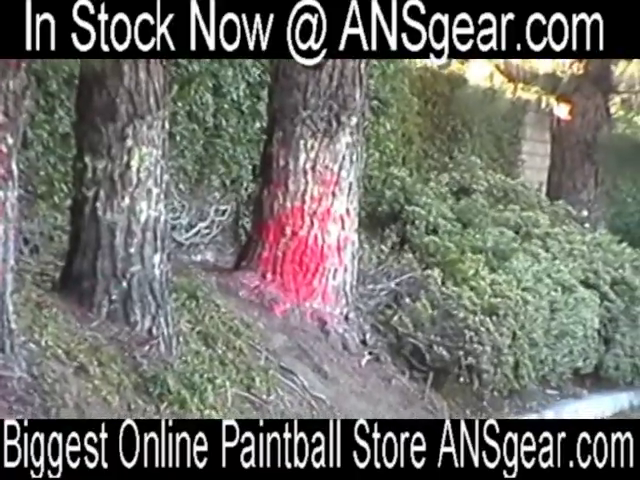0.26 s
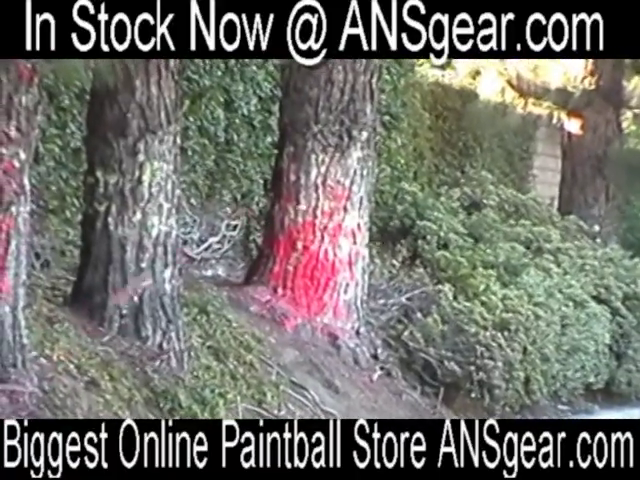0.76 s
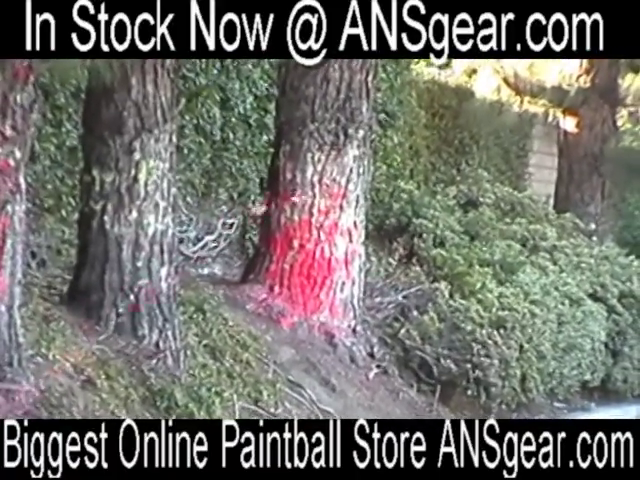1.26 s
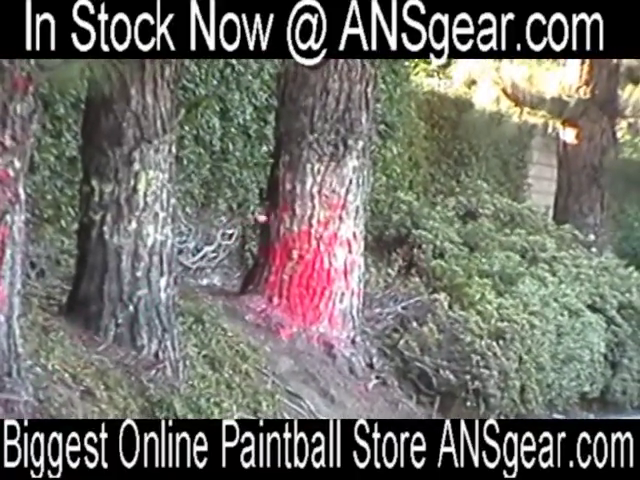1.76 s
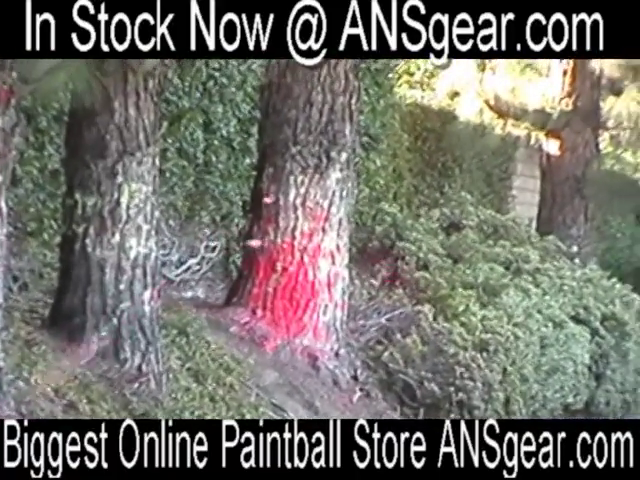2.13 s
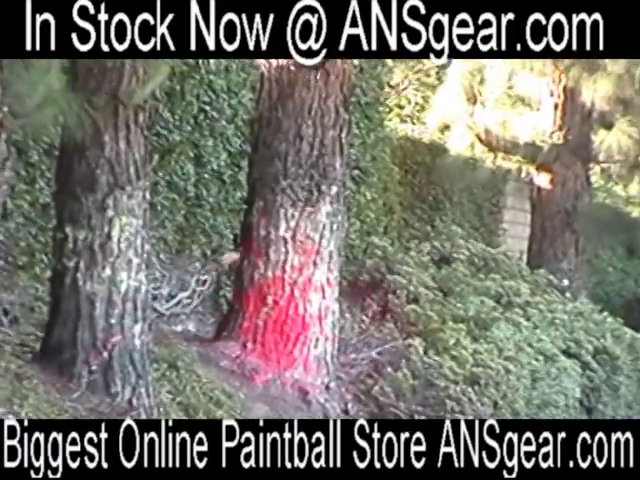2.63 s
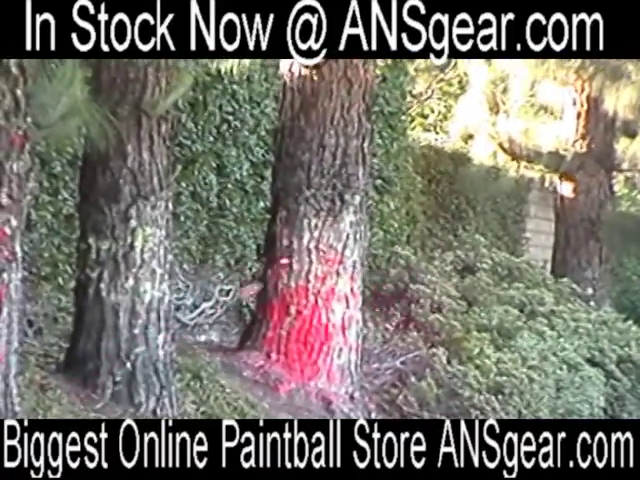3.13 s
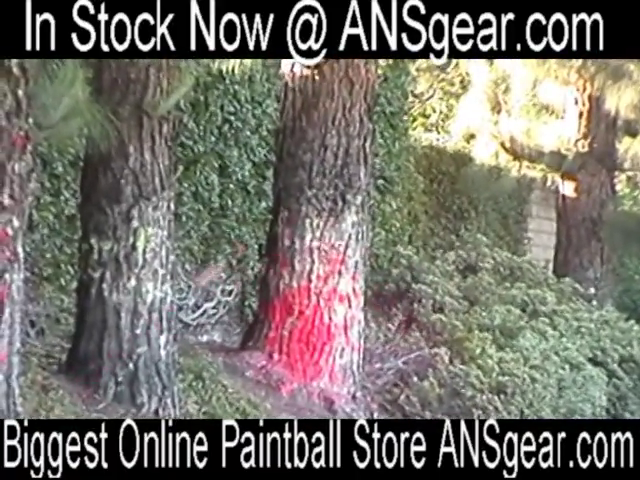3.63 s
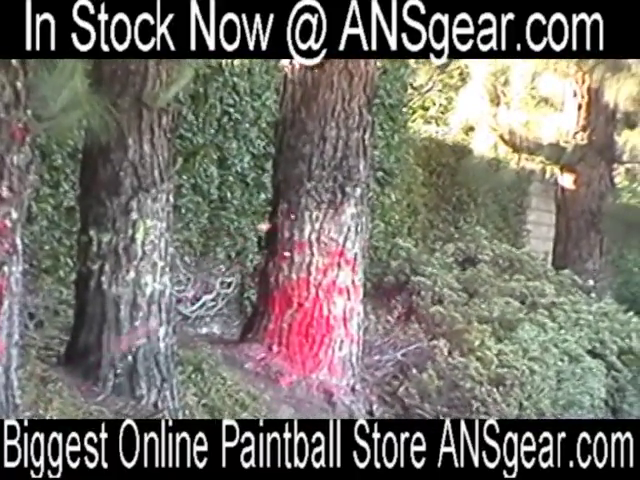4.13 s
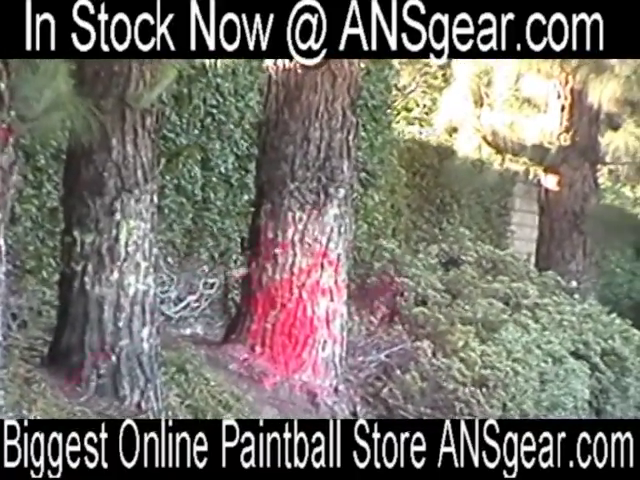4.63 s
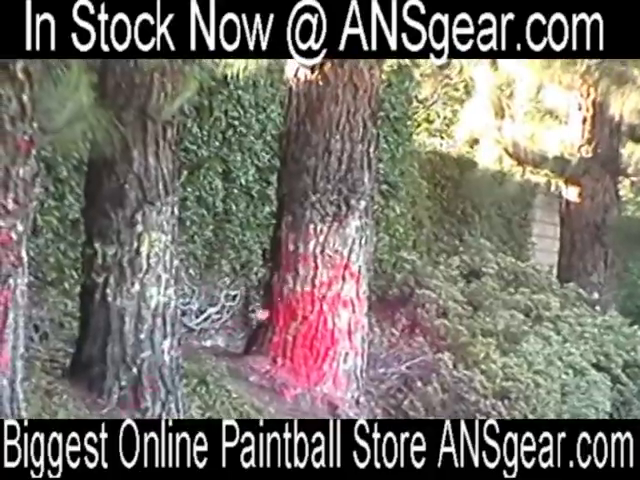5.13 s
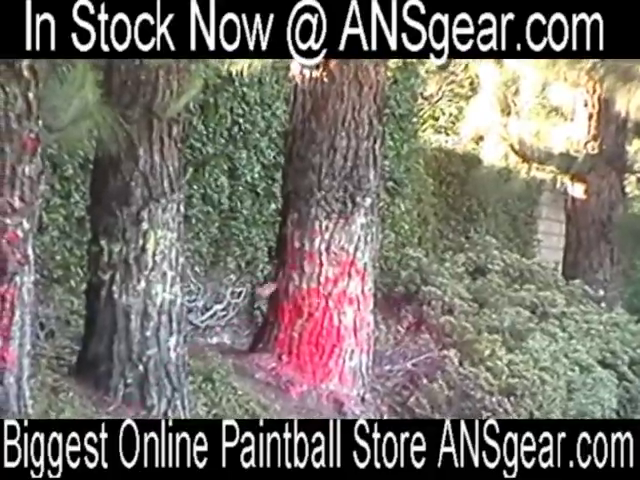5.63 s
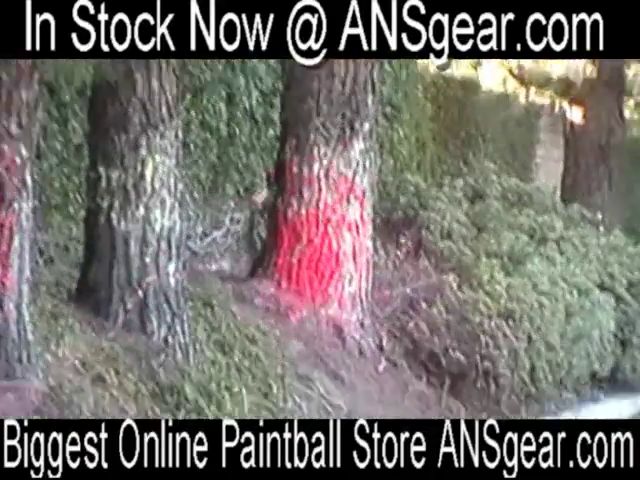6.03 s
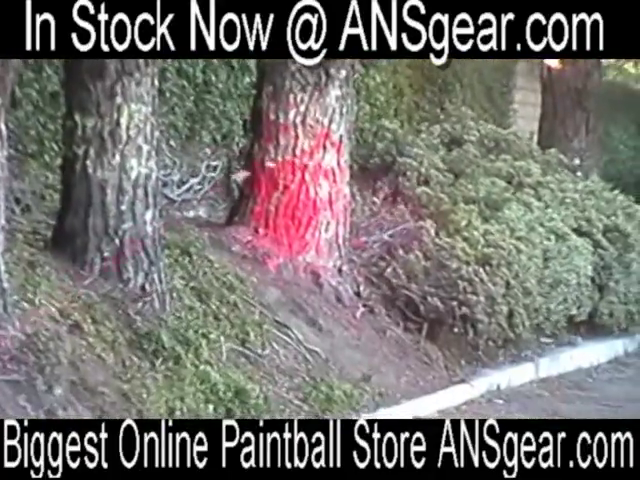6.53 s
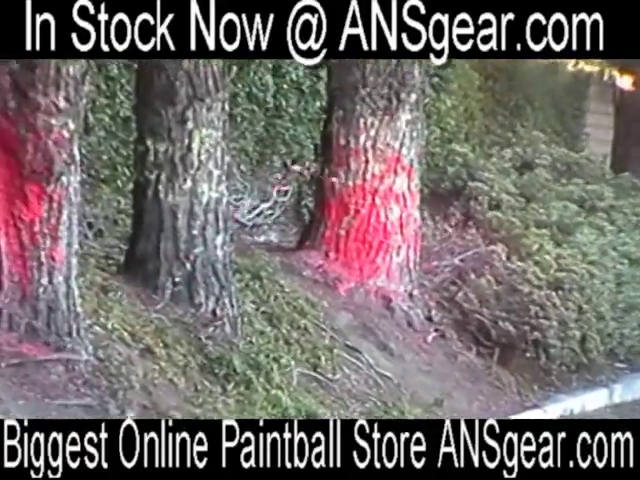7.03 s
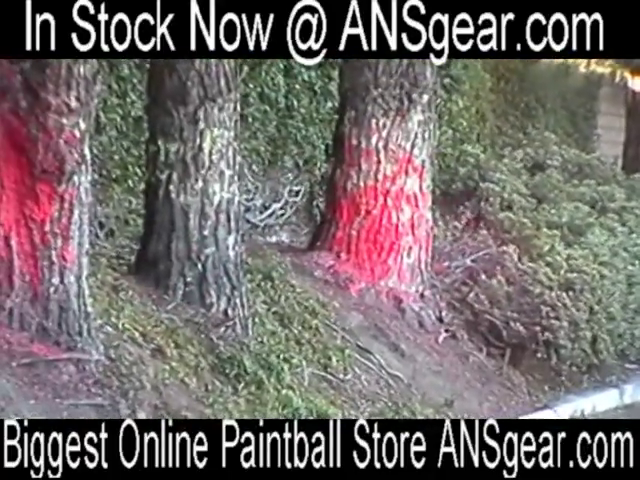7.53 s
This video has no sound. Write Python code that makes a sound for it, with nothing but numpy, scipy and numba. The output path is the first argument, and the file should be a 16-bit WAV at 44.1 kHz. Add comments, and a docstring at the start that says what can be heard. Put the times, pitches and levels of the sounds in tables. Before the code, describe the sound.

A quiet street with low, distant traffic and a faint, high cricket pulsing quickly. At about 0.2 s a plastic loader clicks sharply, with smaller ticks after it. A compressed-air paintball gun, close by, fires single shots at 0.4 and 0.5 s, each a short vent hiss, rattling metal bolt, hollow barrel pop and hard knock back. From 0.7 to 1.6 s shots run together at about fifteen a second. Clicks surround one lone shot at 1.7 s, then a long, even stream hammers from 1.9 to 6.6 s. A click at 6.7 s precedes five last shots, ending near 7.0 s. The street answers with a brief scattered hiss. The microphone's automatic gain presses the background down during firing; afterwards traffic and cricket rise again while several plastic clicks rattle between 7.1 and 7.6 s. The engine drone gradually thins as a vehicle draws away.

```python
"""A compressed-air paintball marker clicks, fires two single shots, then long fast streams, on a street.
Distant traffic (shaped noise) and a cricket (pulsed tones) run throughout, and clicks ring a plastic loader.
Each shot is one cycle: a valve vents, the bolt rattles forward, the barrel blasts, the bolt knocks back.
The street answers each bang with a fading hiss. Loud shots make the gain control turn everything down;
after the last shots it lets go, so traffic and cricket come up again between the final clicks."""
import sys
import numpy as np
from scipy import signal
from scipy.fft import rfft, irfft, next_fast_len
from scipy.io import wavfile
from scipy.ndimage import uniform_filter1d
from numba import njit

SR = 44100
rng = np.random.default_rng(int(sys.argv[2]) if len(sys.argv) > 2 else 0)


def transcribe(signal):
    """Save signal, clipped to [-1, 1], as a 16-bit WAV file at the path in sys.argv[1]."""
    frames = np.atleast_2d(signal).T
    limited = np.clip(frames, -1, 1)
    pcm = np.round(limited * 32767).astype(np.int16)
    wavfile.write(sys.argv[1], SR, pcm)


N = 342638  # length of the scene in samples

# Distant traffic's tone balance. Each row: pitch in Hz, relative level in dB per Hz.
TRAFFIC_TONE = [(24, -32), (55, -10.5), (130, -6), (185, -1.5), (400, -11), (860, -10.5), (2000, -14.5),
                (5000, -27), (10000, -35), (15000, -84)]
# The cricket's two wing tones, in Hz.
WING_TONES_HZ = (6950, 7300)
# Clicks of loader and trigger. Each row: time in seconds, relative level in dB, favoured pitch in Hz.
CLICK_EVENTS = [(0.1866, 3, 3960), (.2660, -10.5, 5050), (0.3097, -14.5, 10000), (.3280, -20, 6000),
                (.5478, -10, 8050), (1.6170, -1, 6260), (1.7375, -8, 2200), (1.8043, -4.5, 3860),
                (6.709, -3, 8000), (7.079, -3.5, 5900), (7.181, -15, 8200), (7.1860, -18, 8300),
                (7.2733, -0.5, 6160), (7.359, 2.5, 6060), (7.4053, -1, 2880), (7.492, -10, 8700),
                (7.566, 0, 2200)]
# Ringing of the plastic loader. Each row: pitch in Hz, width in Hz, relative level in dB.
LOADER_MODES = [(2160, 600, 10.5), (2960, 220, -15), (3930, 330, 5.5), (4510, 650, -6), (6150, 700, 5),
                (7370, 300, 4), (8740, 330, 3), (9100, 400, -2), (13200, 500, -10)]
# One time per shot: the moment of the bolt's knock back, in seconds.
SHOT_TIMES = [0.3787, 0.5292, 0.705, 0.7866, 0.8505, 0.9164, 0.9778, 1.044, 1.1083, 1.1738, 1.2399, 1.3056,
              1.369, 1.433, 1.4997, 1.565, 1.708, 1.8953, 1.971, 2.0391, 2.1045, 2.1697, 2.2323, 2.2957,
              2.3579, 2.4215, 2.4856, 2.549, 2.6146, 2.679, 2.7435, 2.8048, 2.8722, 2.9365, 3.0013, 3.067,
              3.133, 3.1972, 3.2618, 3.3243, 3.3816, 3.4449, 3.5073, 3.5718, 3.6373, 3.7047, 3.7711, 3.835,
              3.8988, 3.9632, 4.0296, 4.0942, 4.161, 4.2276, 4.2935, 4.3595, 4.4231, 4.4845, 4.551, 4.6144,
              4.6796, 4.7422, 4.8064, 4.8649, 4.9263, 4.9885, 5.0501, 5.1154, 5.179, 5.2432, 5.3064, 5.3692,
              5.4314, 5.4952, 5.5604, 5.6235, 5.6892, 5.7533, 5.818, 5.8804, 5.9442, 6.0102, 6.0788, 6.1408,
              6.2033, 6.2605, 6.3238, 6.3907, 6.453, 6.5165, 6.5775, 6.6421, 6.7624, 6.8414, 6.906, 6.9722,
              7.0397]
# The blows of one cycle, before the stroke's pace stretches it.
# Each row: ms from the knock back, crack level in dB, air hiss level in dB, favoured pitch in Hz.
CYCLE_BLOWS = [(-32.5, -21, -32, 5000), (-22, -6, -27, 1600), (-18.5, -1.5, -16, 6700),
               (-18.8, -2, -16, 3030), (-18, 3.5, -17, 1400), (-17, 1.5, -12.5, 3740), (-14.5, 9, -8, 9000),
               (-14.5, 4, -16.5, 3100), (-12.5, 7.5, -21, 1900), (-12.5, -1, -14.5, 6200),
               (-8, 2, -14.5, 5800), (-6, -2.5, -25, 5900), (-4.5, -16, -27, 4700), (0.26, 8, -27, 2790),
               (.5, 5.5, -9.5, 11000), (4, -3, -25, 8600), (5.5, -1, -25, 1900), (6.4, 0, -15.5, 3900),
               (12.5, -18, -31.5, 3700), (19, -26, -29, 7200)]
# Low puffs of air in one cycle, before the stroke's pace stretches it.
# Each row: ms from the knock back, relative pop level in dB, relative barrel ring level in dB.
AIR_PUFFS = [(-19, -6, -32), (-17.5, -22, 12), (-14.5, -4.5, -32), (-14, -14, -2), (-10.5, -32, 6),
             (-8.5, -6, -28), (0.25, 2.43, -6.5)]
# Ringing of the metal body. Each row: pitch in Hz, width in Hz, relative level in dB.
BODY_MODES = [(1470, 430, 3.5), (2066, 202, 8.5), (2474, 215, 5.5), (2900, 500, -1), (3750, 183, 10),
              (5350, 330, 3), (5860, 150, 8.5), (6440, 210, 9.5), (6800, 330, 8.5), (8610, 760, 3.5),
              (9800, 460, 2), (12800, 920, 7.5)]
# Ringing air in barrel and chambers. Each row: pitch in Hz, width in Hz, relative level in dB.
BARREL_MODES = [(145.5, 27.3, -8.5), (330, 40, 1.2), (438, 60, -8.5), (781, 88, -6.5)]
# Resonances of the vent jet besides its whistle. Each row: pitch in Hz, width in Hz, relative level in dB.
VENT_MODES = [(1560, 260, -12), (2900, 580, -9), (4600, 230, -14), (7000, 1600, -17), (8280, 720, -11),
              (9100, 300, -7), (11760, 1200, -7.5)]
# Level of the left port against the right. Each row: pitch in Hz, left minus right in dB.
LEFT_LEVEL = [(60, -1.5), (180, -2.5), (550, 1), (1650, 1.5), (4970, 2), (8500, -0.5), (13000, -0.5)]
# Timing of the left port against the right. Each row: pitch in Hz, lead of the left in radians.
LEFT_PHASE = [(0, 0.18), (9990, 0.35), (11800, 1.2), (13100, 0.9), (15400, 0.3)]
# The street's echo tail. Each row: pitch in Hz, seconds to fall by 60 dB, relative starting level in dB.
ECHO_TAIL = [(96, 0.28, -7.5), (900, 0.45, 0.5), (3880, 0.68, -4.5), (7700, 0.46, -0.5), (10800, 0.57, -8),
             (14500, 0.19, -7)]
# How alike left and right are in diffuse sound. Each row: pitch in Hz, likeness from 0 to 1.
LIKENESS = [(500, .97), (4000, 0.9), (8500, 0.94), (10500, 0), (15000, 0.1)]
# Tone colour of the microphone. Each row: pitch in Hz, gain in dB.
MIC_COLOUR = [(40, -16), (70, 12), (1000, 0), (1750, -1), (2300, 0), (3150, -2.5), (4000, -1),
              (11000, -3.5), (13500, -13), (15500, -36)]

TRAFFIC_DB, CRICKET_DB = -37, -42.5
TICK_T60_MS, HISS_T60_MS, STRIKE_T60_MS = 9.2, 16.2, 2.47  # ms to fall by 60 dB
STIFF_SHARE, STIFF_SHOTS = .03, 2.47  # early strokes take longer; this loosens over a few shots
STROKE_SPREAD, SCATTER_MS = .006, 0.049  # chance in stroke length (share) and in each blow's time
VENT_LEAD_MS, VENT_RISE_MS, VENT_FALL_DB_PER_MS = 30.4, 1.12, 1.6  # the lead stretches with the stroke
RESTED_DB, REFILL_S = 6.5, 0.11  # the vent's pop gains up to this much after a rest
DRIVE_SPREAD_DB = 3.5  # chance in the vent's drive; jet and whistle follow only part of the drive
SPAN, BEFORE = 4096, 1764  # samples in one event's sound, and how many come before its time
HIGHEST_HZ = 15830  # upper band limit


def amp(db):
    """Turns dB into a plain multiplier."""
    return 10 ** (np.asarray(db) / 20)


def read(points, hz):
    """Straight lines between (Hz, value) points on a log-frequency axis."""
    f, value = np.transpose(points)
    return np.interp(np.log(hz + 1), np.log(f + 1), value)


def mode(hz, centre_hz, width):
    """Complex response of one damped resonance, gain 1 at its centre."""
    return 1j * hz * width / (centre_hz ** 2 - hz ** 2 + 1j * hz * width)


def ring(hz, modes, favoured_hz=None, octaves=.5):
    """Sum of modes; a blow drives those near its favoured pitch most."""
    total = 0
    for centre_hz, width, db in modes:
        drive = 1
        if favoured_hz is not None:
            drive = np.exp(-.5 * (np.log2(centre_hz / favoured_hz) / octaves) ** 2)
        total = total + amp(db) * drive * mode(hz, centre_hz, width)
    return total


def place(times, spectra):
    """Adds each event's sound at its time; BEFORE samples precede the time."""
    out = np.zeros(N + SPAN)
    for s, sound in zip(times, irfft(spectra, SPAN)):
        start = round(s * SR) - BEFORE
        out[start:start + SPAN] += sound
    return out[:N]


def diffuse(count):
    """Frequencies, and spectra of a left and a right noise that are partly alike."""
    hz = np.fft.rfftfreq(count, 1 / SR)
    left, other = rfft(rng.standard_normal((2, count)))
    same = np.clip(read(LIKENESS, hz), 0, 1)
    right = same * left + np.sqrt(1 - same ** 2) * other
    return hz, np.array([left, right])


def traffic():
    """Diffuse rumble; its low engine drone fades as a vehicle draws away."""
    count = next_fast_len(N)
    hz, rumble = diffuse(count)
    rumble = rumble * amp(read(TRAFFIC_TONE, hz))
    low = 1 / (1 + (hz / 300) ** 4)
    drone = irfft(rumble * low, count)[:, :N]
    wash = irfft(rumble * (1 - low), count)[:, :N]
    away = np.arange(N) / N  # 0 at the start, 1 at the end
    mix = drone * amp(-5.0 * away) + wash * amp(0.96 * away)
    return amp(TRAFFIC_DB) * mix / (drone + wash).std()


def cricket():
    """Two close wing tones in pulses, fifty a second, swelling about every four pulses."""
    t = np.arange(N) / SR
    phase = ((t - .099) * 50.0 + .5) % 1 - .5  # 0 at the middle of each pulse
    pulse = np.exp(-(phase / .2) ** 2)
    swell = .35 + .65 * np.cos(np.pi * (t - .092) * 12.66) ** 2
    tones = sum(np.sin(2 * np.pi * hz * t) for hz in WING_TONES_HZ)
    smooth_noise = uniform_filter1d(uniform_filter1d(rng.standard_normal(N), size=40), size=40)
    rasp = .5 + 6.0 * smooth_noise  # roughens the tones
    return amp(CRICKET_DB) * pulse * swell * tones * rasp


def clicks():
    """A short tick of noise rings the loader's plastic."""
    hz, ms = np.fft.rfftfreq(SPAN, 1 / SR), np.arange(1024) / SR * 1000
    thin = mode(hz, 4300, 13400) ** 2  # small parts radiate little bass
    spectra = []
    for _, db, favoured_hz in CLICK_EVENTS:
        tick = rng.standard_normal(1024) * amp(-60 * ms / TICK_T60_MS)
        tick[0] += 3.0  # a sharp start
        tick = np.roll(np.pad(tick, (0, SPAN - 1024)), BEFORE)
        shell = 0.28 * mode(hz, 4500, 9000) + ring(hz, LOADER_MODES, favoured_hz, octaves=0.98)
        spectra.append(amp(db) * rfft(tick) * shell * thin)
    return place([row[0] for row in CLICK_EVENTS], np.array(spectra))


def marker():
    """Every shot runs the same cycle of blows with a little scatter, after a hissing vent."""
    shots = np.reshape(SHOT_TIMES, (-1, 1))
    count = len(shots)
    hz, ms = np.fft.rfftfreq(SPAN, 1 / SR), np.arange(SPAN) / SR * 1000
    thin = mode(hz, 3450, 16200)  # small metal parts radiate little bass

    # chance per shot, then how long each stroke takes and how rested the air is
    lag, drift, gust = rng.standard_normal((count, 3, 1)).transpose(1, 0, 2)
    stiff = STIFF_SHARE * np.exp(-np.arange(count)[:, None] / STIFF_SHOTS)
    pace = 1 + stiff + STROKE_SPREAD * lag
    rested = 1 - np.exp(-(np.diff(shots, axis=0, prepend=0) / REFILL_S) ** 2)

    def delay(at_ms):
        """Shifts a sound in time by turning the phase of its spectrum."""
        return np.exp(-2j * np.pi * hz * (at_ms / 1000 + BEFORE / SR))

    def puff(pop_db, ring_db):
        """One quick swing of air, and the ringing of the air columns."""
        pop = mode(hz, 603, 1320) ** 2
        return amp(10.0) * (amp(pop_db) * pop + amp(ring_db) * ring(hz, BARREL_MODES))

    total = 0
    for at_ms, crack_db, hiss_db, favoured_hz in CYCLE_BLOWS:
        late, size = rng.standard_normal((count, 2, 1)).transpose(1, 0, 2)
        burst = rng.standard_normal((count, 1024)) * amp(-60 * ms[:1024] / HISS_T60_MS)
        strike = rng.standard_normal(1024) * amp(-60 * ms[:1024] / STRIKE_T60_MS)
        chatter = 1 + 0.271 * rfft(strike, SPAN)  # a part strikes with the same pattern in every shot
        crack = amp(crack_db + 1.3 * size) * chatter
        hiss = amp(hiss_db) * rfft(burst, SPAN)
        metal = 0.5 * mode(hz, favoured_hz, 2.46 * favoured_hz)
        metal = metal + ring(hz, BODY_MODES, favoured_hz, octaves=0.32)
        total = total + (crack + hiss) * metal * thin * delay(at_ms * pace + SCATTER_MS * late)

    for at_ms, pop_db, ring_db in AIR_PUFFS:
        size = amp(0.8 * rng.standard_normal((count, 1)))
        total = total + size * puff(pop_db, ring_db) * delay(at_ms * pace)

    # a stronger jet also whistles more
    drive_db = RESTED_DB * rested + DRIVE_SPREAD_DB * gust
    flow = np.minimum(ms / VENT_RISE_MS, 1) * amp(-VENT_FALL_DB_PER_MS * ms)
    jet = rfft(rng.standard_normal((count, SPAN)) * flow)
    whistle = amp(.5 * drive_db + 1.0) * mode(hz, 5150 + 110 * drift, 278)
    pipe = 0.2 * mode(hz, 6300, 6600) + ring(hz, VENT_MODES) + whistle
    vent = amp(0.38 * drive_db + 0.5) * jet * pipe * thin
    vent = vent + amp(RESTED_DB * rested) * puff(-0.55, -10.0)
    total = total + vent * delay(-VENT_LEAD_MS * pace)
    return amp(12.5) * place(shots[:, 0], total)


def ports(x):
    """Two microphone ports hear a near source with small level and phase offsets; the top treble differs."""
    count = next_fast_len(N)
    hz = np.fft.rfftfreq(count, 1 / SR)
    # half the offset goes to each side
    half = amp(read(LEFT_LEVEL, hz) / 2) * np.exp(.5j * read(LEFT_PHASE, hz))
    flutter = uniform_filter1d(rng.standard_normal(N), size=30) * np.sqrt(30)
    apart = amp(-10.0) * rfft(x * flutter, count) * mode(hz, 12000, 5000) ** 2
    both = rfft(x, count) * np.array([half, 1 / half])
    return irfft(both + np.array([apart, -apart]), count)[:, :N]


def street(x):
    """Houses and leaves scatter each bang into a plain hiss; each pitch dies away at its own speed."""
    f, t60, db = np.transpose(ECHO_TAIL)
    tail = irfft(diffuse(SR)[1], SR)
    hz, t, z = signal.stft(tail, SR, nperseg=256)
    start_db = read(np.c_[f, db], hz)[:, None]
    fall_db = 60 * t / read(np.c_[f, t60], hz)[:, None]
    tail = signal.istft(z * amp(start_db - fall_db), SR, nperseg=256)[1]
    # the first echoes need time to return
    tail = tail * np.clip(np.arange(tail.shape[1]) / SR / 0.0039, 0, 1)
    scattered = x * rng.choice([-1., 1.], N)  # keeps the loudness of the bang, loses its ring
    return signal.fftconvolve(scattered[None], tail / np.linalg.norm(tail[0]), axes=1)[:, :N]


def scene():
    """Adds near sounds, their street echo, traffic and cricket."""
    near = marker() + clicks()
    return ports(near) + amp(-17.5) * street(near) + traffic() + cricket()


@njit
def follow(over_db, attack, hold, release_db):
    """Gain reduction climbs towards the excess, waits, then lets go at a steady rate."""
    out, state, wait = np.zeros(len(over_db)), 0.0, 0.0
    for i in range(len(over_db)):
        if over_db[i] > state:
            state += attack * (over_db[i] - state)
            wait = hold
        elif wait > 0:
            wait -= 1
        else:
            state = max(state - release_db, 0.0)
        out[i] = state
    return out


def level_db(x):
    """Short-time loudness of both channels together, averaged over 88 samples."""
    power = uniform_filter1d((x ** 2).mean(0), size=88)
    return 10 * np.log10(abs(power) + 1e-12)


def record(dry):
    """Microphone colour, a slow and a quick gain control, clipping, band limit."""
    hz = np.fft.rfftfreq(4096, 1 / SR)
    log_gain = np.log(amp(read(MIC_COLOUR, hz)))
    circle = np.r_[log_gain, log_gain[-2:0:-1]]
    # a causal filter: its response never starts before the sound
    taps = np.fft.ifft(np.exp(circle - 1j * signal.hilbert(circle).imag)).real
    x = signal.oaconvolve(dry, taps[None, :2048], axes=1)[:, :N]
    # each control acts above -14 or -9 dB: attack in s, hold in s, release in dB per s
    x = x / amp(follow(level_db(x) + 14.0, 1 / (0.0247 * SR), .2 * SR, 25.0 / SR))
    x = x / amp(follow(level_db(x) + 9.0, 1 / (.002 * SR), .01 * SR, 100.0 / SR))
    x = np.clip(x, -.9, .9)
    band = signal.firwin(511, HIGHEST_HZ, window=("kaiser", 9), fs=SR)
    return signal.oaconvolve(x, band[None], "same")


dry = scene()
out = record(dry)
transcribe(out)
```